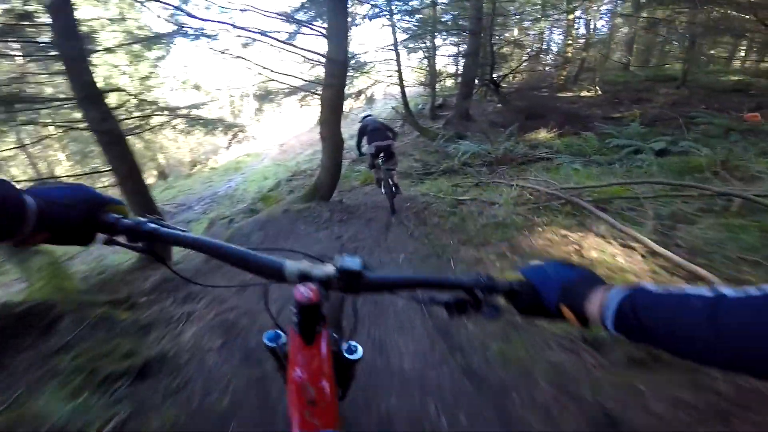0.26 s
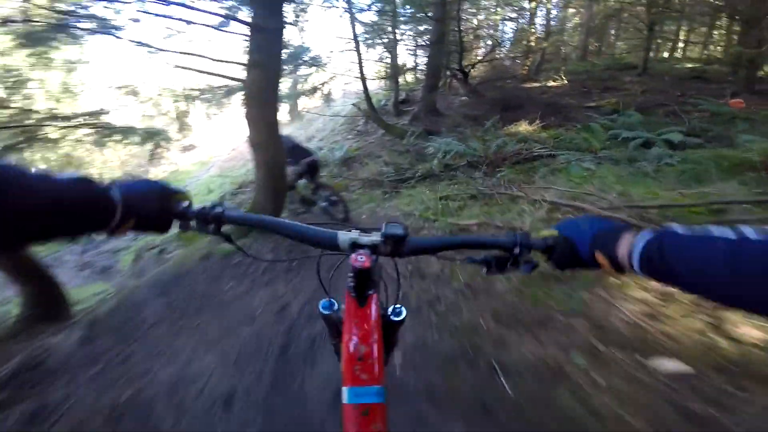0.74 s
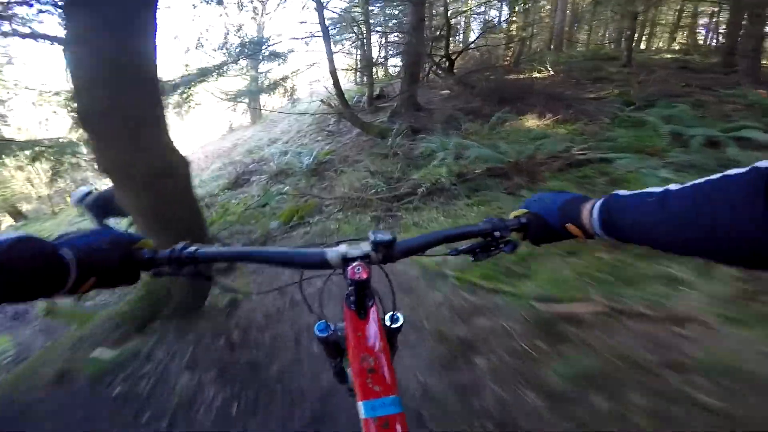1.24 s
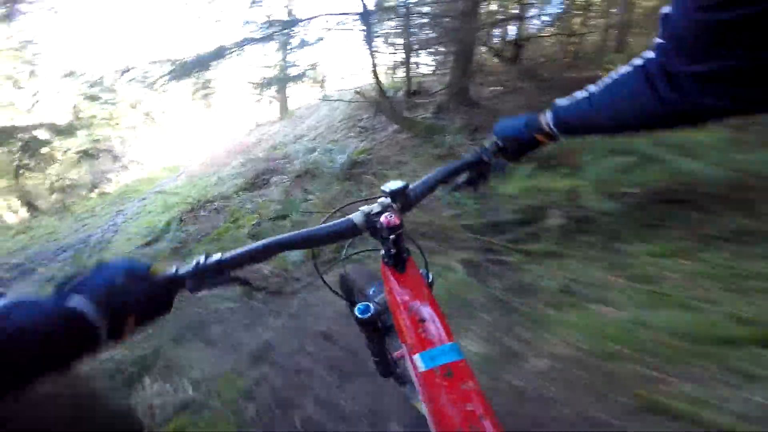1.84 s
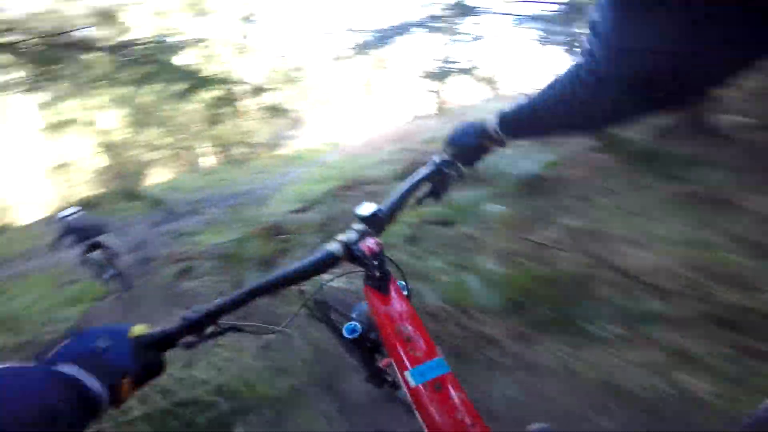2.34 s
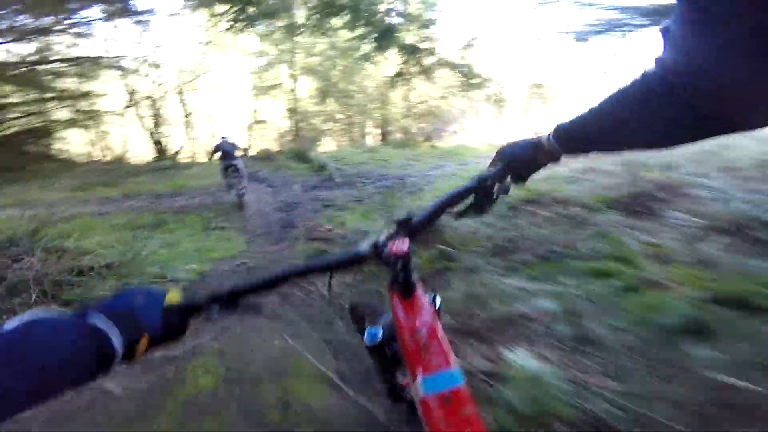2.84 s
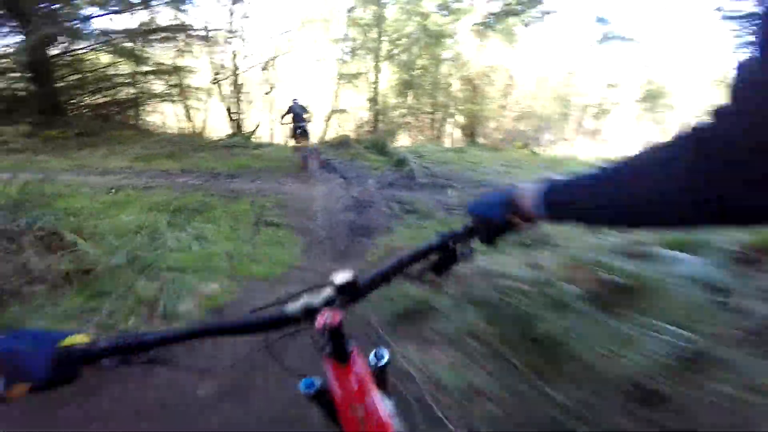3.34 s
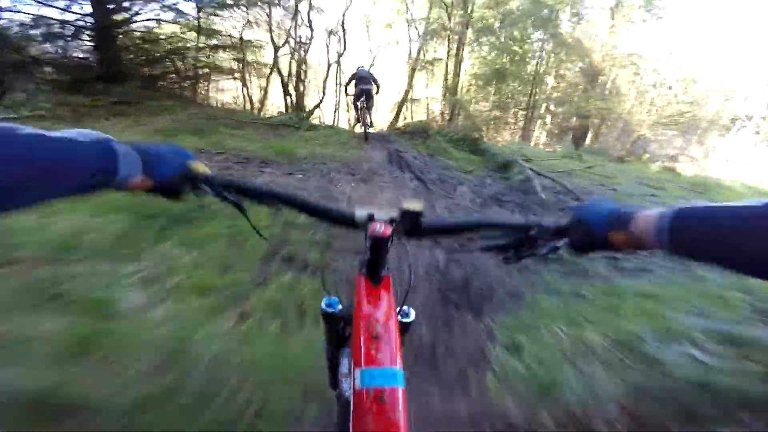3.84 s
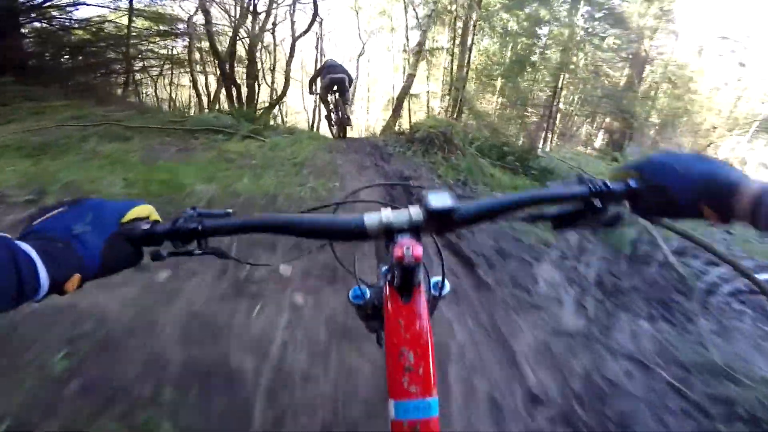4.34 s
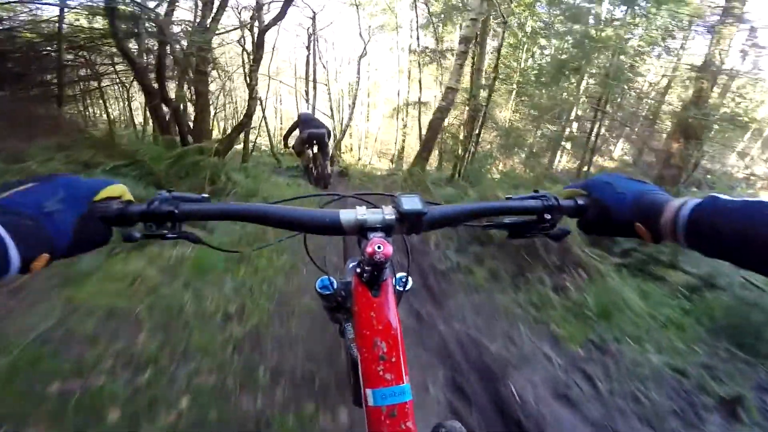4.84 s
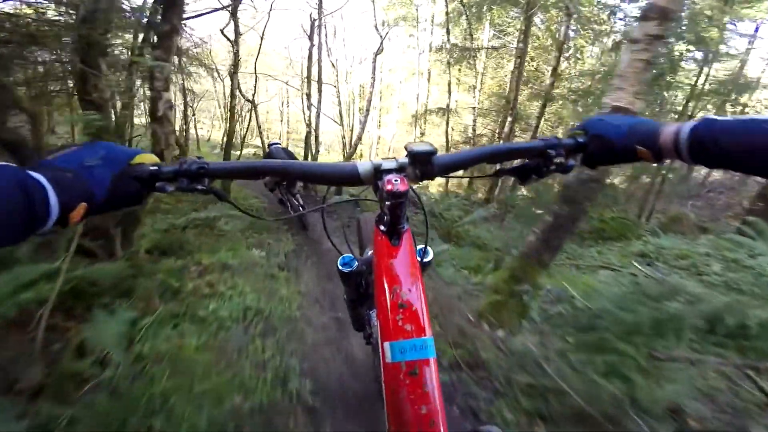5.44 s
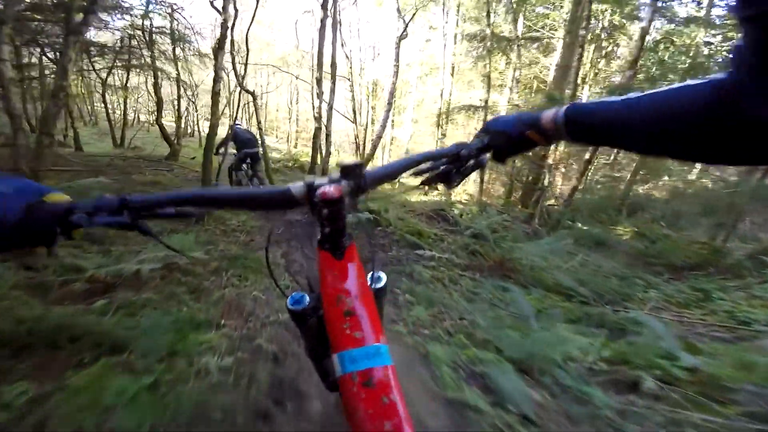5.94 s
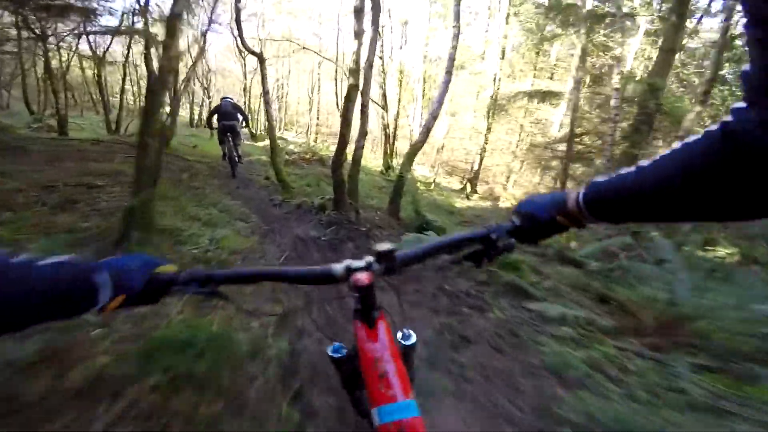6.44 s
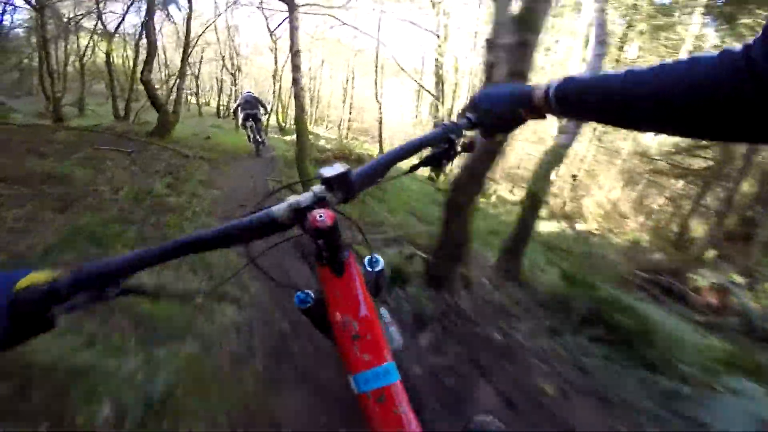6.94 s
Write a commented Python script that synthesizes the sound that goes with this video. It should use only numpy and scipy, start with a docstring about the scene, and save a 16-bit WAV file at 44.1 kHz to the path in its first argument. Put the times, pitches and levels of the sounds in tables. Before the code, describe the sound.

From a microphone worn by the rider, uneven low wind rumble and soft thumps dominate as a mountain bike coasts down a dirt forest trail. Beneath it tyres crunch soil and hiss over grit while the freehub ticks and buzzes. Chain and cables snap sharply on bumps, with a hard hollow knock at two and a half seconds, stones clattering around four, and a loud tyre scrub after six.

```python
"""Wind rumbles and buffets on a chest-worn microphone as a mountain bike coasts fast down a dirt forest trail.
The air is shaped noise with kicks and single swings of pressure; tyres, scrubs and rims are filtered grains.
Struck modes make the stones and knocks, and filtered contacts make chain and cables snap on the frame.
The freehub ticks and buzzes through pawl clicks, and near the end a tyre scrubs through loose dirt."""
import sys
import numpy as np
from scipy import signal
from scipy.fft import rfft, irfft, next_fast_len
from scipy.io import wavfile
from scipy.ndimage import uniform_filter1d, map_coordinates

SR = 44100
rng = np.random.default_rng(int(sys.argv[2]) if len(sys.argv) > 2 else 0)


def wav_out(sig):
    """Save sig, one row per channel (or a flat mono array), as 16-bit PCM at SR to the path in sys.argv[1]."""
    wavfile.write(sys.argv[1], SR, np.round(np.clip(np.atleast_2d(sig).T, -1, 1) * 32767).astype(np.int16))


N = 317079
T = np.arange(N) / SR

# Levels are relative: trims in the functions may shift them. Every spectrum is brought to rms 1.
# Air past the microphone, slack where the rider is sheltered or unweighted.
# Each row: time in seconds, rumble in dB.
WIND_FLOW = [(0, -29), (.28, -17), (.43, -32.5), (.57, -17.5), (1.72, -21), (2.28, -15), (2.42, -37),
             (2.63, -19.5), (2.92, -19.5), (3.1, -32.5), (3.38, -23), (3.53, -27), (4.19, -18),
             (4.31, -37.5), (4.69, -32), (4.86, -18), (5.16, -26.5), (5.39, -28.5), (5.58, -20.5),
             (7.19, -18.5)]
# How broken the flow is. Each row: time in seconds, flutter in dB.
TURBULENCE = [(0, -45.5), (.28, -38), (.43, -52), (.55, -46.5), (.97, -22.5), (1.17, -39.5), (1.55, -39.5),
              (1.93, -30), (2.1, -20.5), (2.43, -46), (2.66, -37.5), (3.07, -51), (3.3, -33.5), (3.53, -50),
              (4.07, -32), (4.33, -44), (5.18, -57), (5.5, -44), (6.25, -42.5), (6.6, -30), (7.19, -32.5)]
# Big eddies. Each row: frequency in Hz, level in dB per Hz.
RUMBLE_SPECTRUM = [(8, -18), (18, -4.5), (28, -2), (52, -3), (72, -8.5), (100, -13), (160, -23), (300, -80)]
# Small eddies. Each row: frequency in Hz, level in dB per Hz.
FLUTTER_SPECTRUM = [(40, -10), (85, -3), (140, -3), (200, -3), (300, -10), (500, -22), (800, -42),
                    (1600, -77)]
# Small eddies popping in strong flow. Each row: frequency in Hz, level in dB per Hz.
RASP_SPECTRUM = [(150, -29), (350, 1.5), (600, -16), (1000, -34), (2500, -50)]
# Deep thumps of air as the body pumps through dips. Each row: centre in seconds, rumble in dB, half length in seconds.
GUSTS = [(.3, -8.5, 0.0099), (1.0, -15, 0.02), (1.125, -14.5, 0.0088), (1.46, -17, 0.051),
         (1.86, -17, 0.062), (2.85, -13, 0.0091), (3.265, -16, 0.047), (3.801, -14.5, 0.023),
         (4.05, -14, 0.028), (4.59, -23.5, 0.027), (4.82, -14, 0.022), (5.46, -17, 0.018),
         (5.73, -24, 0.018), (5.87, -20, 0.0099), (6.1, -14, 0.062), (6.53, -10, 0.017),
         (6.82, -15.5, 0.029), (7.17, -13.5, 0.011)]
# The flow lets go of the microphone for a moment. Each entry: centre in seconds.
LULL_TIMES = [1.17, 1.95, 2.19, 2.45, 2.78, 3.15, 3.94, 4.27, 4.67, 5.654, 5.985, 6.77]
LULL_DB, LULL_HALF_S = -10.5, .026
# Eddies that hit the microphone as the rider is jolted.
# Each row: centre in seconds, level in dB, length in seconds, upper edge in Hz.
BUFFETS = [(0.163, -17, 0.0029, 199), (0.298, -18.5, 0.006, 200), (0.549, -19, 0.031, 166),
           (0.792, -14.5, 0.014, 222), (0.893, -16.5, 0.0096, 220), (0.937, -16, 0.013, 253),
           (1.006, -10, 0.007, 330), (1.061, -12.5, 0.013, 211), (1.113, -15, 0.0053, 227),
           (1.241, -17, 0.0057, 254), (1.303, -15.5, 0.004, 161), (1.455, -12.5, 0.01, 229),
           (1.558, -11, 0.0063, 200), (1.594, -13.5, 0.0038, 190), (1.62, -16, 0.0067, 250),
           (1.805, -10.5, 0.013, 250), (2.024, -14, 0.0069, 230), (2.068, -14, 0.027, 270),
           (2.249, -11.5, 0.028, 320), (2.319, -14.5, 0.0041, 219), (2.69, -19, 0.0061, 179),
           (2.834, -16, 0.0074, 95), (2.914, -14, 0.0046, 240), (4.834, -13, 0.011, 142),
           (4.875, -21, 0.0044, 149), (5.313, -15, 0.005, 155), (5.525, -15.5, 0.005, 116),
           (5.571, -16, 0.0063, 146), (5.611, -16, 0.0038, 129), (5.744, -16, 0.012, 122),
           (5.919, -19.5, 0.014, 105), (6.071, -13, 0.011, 158), (6.1, -14, 0.017, 396),
           (6.145, -18, 0.0044, 200), (6.517, -9.5, 0.0088, 322), (6.636, -13.5, 0.0032, 293),
           (6.696, -10.5, 0.011, 338), (6.815, -10.5, 0.0089, 420), (6.865, -14.5, 0.02, 240),
           (7.067, -18.5, 0.0023, 443), (7.149, -16, 0.0027, 454)]
# the flutter that trails each buffet
WAKE_DB, WAKE_HALF_S, WAKE_LAG_S = -19.5, 0.024, 0.005
# flow calmer than BROKEN_DB loses the top of its rumble
SMOOTH_HZ, SMOOTH_DB_PER_DB, BROKEN_DB = 74, 0.16, -30
# Tight single vortices in the hardest jolts. Each row: centre in seconds, peak in dB, pitch in Hz.
POPS = [(0.2944, -9, 191), (0.7931, -14, 210), (0.9642, -14, 230), (1.42, -9, 167), (1.8141, -7.5, 230),
        (2.0516, -12.5, 190), (2.0689, -14, 180), (2.2317, -11, 350), (2.2438, -1.5, 250),
        (2.2467, -0.5, 473), (2.2561, -10, 310), (2.2608, -7, 330), (2.2977, -10, 220), (6.8042, -10, 270),
        (6.811, -5.5, 290), (6.8203, -3, 310), (6.8293, -13, 280), (6.9832, -12, 250)]
# Soft airy swishes over the tyre noise. Each row: centre in seconds, level in dB, half length in seconds.
SWISHES = [(.88, -49.5, 0.16), (3.05, -50, 0.2), (5.34, -48.5, 0.098)]
# Hiss of a swish. Each row: frequency in Hz, level in dB per Hz.
SWISH_SPECTRUM = [(2500, -27), (4000, 5), (5000, 2), (5750, 10), (6500, -13), (10000, -35)]

# Tyres on the ground. Each row: time in seconds, crunch of soil in dB, hiss of needles and grit in dB.
TYRE_LEVELS = [(0, -40, -44.5), (.3, -38.5, -44), (.47, -43.5, -47), (.75, -37, -48), (.95, -37, -44.5),
               (1.12, -39.5, -46.5), (1.62, -37.5, -47.5), (1.9, -39, -50), (2.5, -37.5, -44.5),
               (2.85, -39.5, -45.5), (3.15, -35, -42.5), (3.7, -37.5, -46), (4.22, -36, -41),
               (4.7, -41, -44.5), (5.15, -41, -47), (5.45, -38.5, -45), (6.3, -39.5, -45.5),
               (6.6, -36, -41.5), (7.19, -39, -42)]
# Crushed soil. Each row: frequency in Hz, level in dB per Hz.
SOIL_SPECTRUM = [(270, 7), (600, 3.5), (850, -0.5), (1100, 3), (1700, 0.5), (2000, -2), (2500, -0.5),
                 (3100, -8.5), (4200, -9.5), (9000, -31)]
# Flicked grit. Each row: frequency in Hz, level in dB per Hz.
GRIT_SPECTRUM = [(1500, -45), (3000, 0.5), (4600, 0.5), (5700, -1), (6600, -3.5), (9000, -4.5),
                 (12000, -9.5), (15000, -9)]
# the crunch has a centre that wanders with the soil, by a fraction of its pitch
CRUNCH_HZ, CRUNCH_WIDTH_HZ, CRUNCH_WANDER = 1567, 335, 0.087
# the finest grit starts faint and comes in as the bike picks up speed
FINE_HZ, FINE_START_DB, PICK_UP_S = 6000, -15, 0.52
# Tread knobs drumming on packed dirt. Each row: time in seconds, level in dB.
TREAD_LEVEL = [(0, -45), (.15, -40), (.45, -45.5), (.65, -43), (2.9, -55), (3.25, -40), (3.6, -46.5),
               (4.15, -56), (4.6, -70), (7.19, -37.5)]
# The drumming glides down in pitch. Each row: time in seconds, pitch in Hz.
TREAD_PITCH = [(.8, 620), (3.2, 532)]
TREAD_WIDTH_HZ = 200
# Tread drumming harder over roots and stones. Each row: centre in seconds, level in dB.
ROOTS = [(.13, -32.5), (3.2, -27), (3.36, -26), (3.379, -23.5)]
ROOT_HALF_S = 0.0057
# Loose stones knocked aside by the tyres. Each row: start in seconds, level in dB, pitch in Hz.
STONES = [(4.013, -24, 1300), (4.034, -19, 1250), (4.079, -18, 620), (4.128, -18, 680), (4.2, -22, 1250),
          (4.488, -21, 1150)]
# A tyre scrubbing sideways or breaking clods. Each row: centre in seconds, level in dB, half length in seconds.
SCRUBS = [(3.21, -35.5, 0.015), (3.369, -32, 0.013), (4.14, -43, 0.072), (6.3745, -14.5, 0.0033),
          (6.385, -28.5, 0.027), (6.525, -27.5, 0.066)]
# Torn ground. Each row: frequency in Hz, level in dB per Hz.
SCRUB_SPECTRUM = [(200, 7), (500, 6.5), (1000, 2), (1900, 1), (2700, -7), (5000, -16), (8000, -26),
                  (15000, -55)]
# Side knobs biting into a turn. Each row: start in seconds, level in dB, fade in seconds.
SCRAPES = [(.505, -35, 0.14), (6.445, -28, 0.044)]
# Raked grit. Each row: frequency in Hz, level in dB per Hz.
SCRAPE_SPECTRUM = [(1000, -11), (1500, 0.5), (3600, -5.5), (4800, -28)]

# The rims sing with the grit under them. Each row: time in seconds, level in dB.
RIM_LEVEL = [(0, -48.5), (1.9, -57), (3.6, -43.5), (5.2, -51), (7.19, -44.5)]
RIM_HZ, RIM_WIDTH_HZ = 2557, 490
# The freehub slips faster or slower as wheel and cranks turn. Each row: time in seconds, pawl clicks a second.
PAWL_RATE = [(0, 31), (.17, 33), (.38, 42), (.45, 55), (.75, 67), (.91, 47), (1, 58), (1.06, 44),
             (1.15, 56), (1.4, 56), (1.75, 122), (2.08, 73), (2.32, 120), (2.7, 66), (3.25, 72), (3.55, 45),
             (4.25, 39), (4.83, 75), (5.1, 62), (5.45, 98), (5.6, 73), (6.1, 70), (6.5, 107), (7.19, 105)]
# How hard the pawls strike. Each row: time in seconds, ticks in dB, steel ping in dB relative to the ticks.
PAWL_LEVEL = [(0, -50, -21), (.33, -51, -25), (.5, -46, -30), (.8, -51, -18), (.9, -47.5, -1.5),
              (1.36, -49, -8), (1.56, -55, -9), (1.94, -49, 0), (2.35, -48, -7), (2.85, -50, -3),
              (3.6, -49.5, -21), (4.1, -51, -14), (4.85, -48, -4.5), (5.5, -47, -5.5), (6.2, -47.5, -12),
              (7.19, -48, -6)]
# The steel ring's ping shifts with load. Each row: time in seconds, mean pitch in Hz.
PING_PITCH = [(.9, 9350), (1.85, 9600), (2.2, 8580), (2.6, 9080), (4.8, 8880), (5.15, 8540), (5.45, 9300),
              (5.8, 8550), (7.19, 8630)]
# The hub shell. Each row: frequency in Hz, level in dB per Hz.
HUB_SPECTRUM = [(1550, -57), (2050, 20), (2650, 17), (3300, 19), (4500, 2.5), (7000, 8.5), (8200, 6.5),
                (11000, 6), (13200, 2), (14200, 9), (15200, -2), (17000, -25)]
# Hollow knocks of the bike over roots. Each row: start in seconds, level in dB.
KNOCKS = [(2.5069, -2), (2.573, -22.5)]
# Modes of a knock. Each row: frequency in Hz, level in dB, t60 in seconds.
KNOCK_MODES = [(1140, 0.5, 0.0044), (1650, -3.5, 0.0072), (1800, -2, 0.012)]
# Chain and cables snapping on the frame.
# Each row: start in seconds, level in dB, brightness in dB per octave, rattle t60 in seconds.
SNAPS = [(0.51, -13, 11, 0.023), (1.006, -11, 4.5, 0.018), (1.394, -16.5, -1, 0.02),
         (1.7031, -12, 0.5, 0.024), (1.97, -15.5, 3, 0.015), (2.0202, -15.5, 0.5, 0.027),
         (2.507, -7.5, 6.5, 0.026), (2.616, -11.5, -8.5, 0.026), (3.355, -14, -1.5, 0.027),
         (3.73, -7.5, -0.5, 0.05), (3.9093, -3.5, 1, 0.0065), (3.994, -22, 4, 0.022),
         (4.399, -8, 0.5, 0.029), (4.503, -21, -7, 0.014), (6.0809, -3, 3.5, 0.021),
         (6.2886, -10.5, 1, 0.015), (6.3597, -17.5, 3, 0.02), (7.038, -12.5, 0, 0.015),
         (7.16, -10, 2.5, 0.026)]
# What the frame makes of a snap. Each row: frequency in Hz, level in dB per Hz.
FRAME_SPECTRUM = [(400, -21), (1000, -4), (1450, 9), (2200, 9.5), (2800, 5.5), (3300, 15), (4200, 6.5),
                  (5100, 13), (6600, 5), (9000, 4), (11000, 0.5), (14500, -15), (16500, 5)]
EDGE_HZ = 15400  # top of the band


def gain_of(db):
    """Decibels to amplitude."""
    return 10 ** (np.asarray(db) / 20)


def evened(x):
    """Scales to rms 1."""
    return x / np.sqrt(np.mean(x ** 2) + 1e-20)


def read(points, hz):
    """A spectrum table in dB, joined on a log-frequency axis."""
    f, db = np.transpose(points)
    return np.interp(np.log(hz + 1), np.log(f + 1), db)


def curves(rows):
    """Each column of a time table, at every sample."""
    s, *columns = np.transpose(rows)
    return [np.interp(T, s, c) for c in columns]


def add(mix, s, sound):
    """Mixes a sound in at time s."""
    part = mix[max(round(s * SR), 0):][:len(sound)]
    part += sound[:len(part)]


def coloured(x, spectrum):
    """Gives x a spectrum, at rms 1."""
    size = next_fast_len(N)
    gain = gain_of(read(spectrum, np.fft.rfftfreq(size, 1 / SR)))
    return evened(irfft(rfft(x, size) * gain, size)[:N])


def drift(per_s):
    """Smooth chance of rms 1, through per_s random points a second."""
    return evened(map_coordinates(rng.standard_normal(4096), [T * per_s], order=2, mode="wrap"))


def steadied(x, size):
    """Evens out the swells of a noise over size samples."""
    power = abs(signal.hilbert(x, next_fast_len(N))[:N]) ** 2
    smooth_power = uniform_filter1d(uniform_filter1d(power, size), size)
    return evened(x / np.sqrt(smooth_power + 1e-6))


def grains(per_s, spread_db):
    """Random tiny impacts, a few of them large."""
    size = gain_of(spread_db * np.minimum(rng.exponential(1, N), 4))
    return evened(size * rng.choice([-1, 1], N) * (rng.random(N) < per_s / SR))


def swells(rows):
    """Rounded bumps of level, down to half at the half length."""
    return sum(gain_of(db) / (1 + np.square(np.square((T - s) / half))) for s, db, half in rows)


def resonate(x, hz, width):
    """A steep resonance whose centre may move, at rms 1."""
    turn = np.exp(2j * np.pi * np.cumsum(hz * np.ones(N)) / SR)
    r = np.exp(-np.pi * width / SR)
    # shift the centre down to 0 Hz, smooth, and shift back
    smooth = signal.lfilter([1], [1, -2 * r, r * r], x / turn + 1e-18)
    return evened((turn * smooth).real)


def ring(modes, t):
    """Dying modes of a struck part."""
    return sum(gain_of(db - 60 * t / t60) * np.sin(2 * np.pi * hz * t) for hz, db, t60 in modes)


def wind(rumble_db=3.0, flutter_db=1.0, lumpy_db=4, rasp_db=-8.5, rasp_growth=0.72,
         gust_flutter_db=-25, surge_db=2.0, flutter_surge_db=3.0):
    """Big eddies rumble in bumps and lulls; small ones flutter, trail buffets and pop apart in stronger flow."""
    [flow_db], [broken_db] = curves(WIND_FLOW), curves(TURBULENCE)
    surge, gusts = drift(20), swells(GUSTS)
    lull_db = LULL_DB * swells([(s, 0, LULL_HALF_S) for s in LULL_TIMES])
    wakes = swells([(s + WAKE_LAG_S, db + WAKE_DB, WAKE_HALF_S) for s, db, _, _ in BUFFETS])
    slow = np.hypot(gain_of(flow_db + lull_db + surge_db * surge), gusts)
    fast = np.hypot(gain_of(broken_db + lull_db + flutter_surge_db * surge),
                    wakes + gain_of(gust_flutter_db) * gusts)

    rumble = steadied(coloured(rng.standard_normal(N), RUMBLE_SPECTRUM), size=1600)
    deep = signal.sosfiltfilt(signal.butter(3, SMOOTH_HZ, fs=SR, output="sos"), rumble)
    top_db = SMOOTH_DB_PER_DB * (broken_db - BROKEN_DB) + flutter_surge_db * (surge - 1)
    rumble = deep + (rumble - deep) * gain_of(np.minimum(top_db, 0))

    lumps = gain_of(lumpy_db * drift(70))
    flutter = steadied(coloured(rng.standard_normal(N), FLUTTER_SPECTRUM) * lumps, size=2400)
    rasp = coloured(grains(130, 0.71), RASP_SPECTRUM) * gain_of(rasp_db + rasp_growth * (broken_db + 28.5))
    return gain_of(rumble_db) * slow * rumble + gain_of(flutter_db) * fast * (flutter + rasp)


def buffets(level_db=-3, low_hz=110, steepness=3.0, kick=0.58):
    """Each eddy is one hard kick of pressure in a short flurry of lesser ones; sharper ones reach higher."""
    out, t = np.zeros(N), (np.arange(8192) - 4096) / SR
    hz = np.fft.rfftfreq(len(t), 1 / SR)
    for s, db, length, edge_hz in BUFFETS:
        low_cut = (1j * hz / (1j * hz + low_hz)) ** 2
        colour = low_cut / np.sqrt(1 + (hz / edge_hz) ** (2 * steepness))
        swell = 1 / (1 + (t / length) ** 4)
        kicks = rng.standard_normal(len(t)) * (rng.random(len(t)) < 500 / SR) * swell
        kicks /= np.linalg.norm(kicks) + 1e-9
        kicks[len(t) // 2] += kick * rng.choice([-1, 1])
        puff = irfft(rfft(kicks) * colour)
        # energy in proportion to length
        puff *= np.sqrt(1.88 * length * SR / np.sum(puff ** 2))
        add(out, s + t[0], gain_of(db + level_db) * puff)
    return out


def pops():
    """A passing vortex pushes the diaphragm, then pulls it: one smooth swing of pressure, quicker when tight."""
    out, t = np.zeros(N), np.arange(-1024, 1024) / SR
    for s, db, hz in POPS:
        u = 2 * np.pi * hz * t
        swing = -u / np.square(1 + u * u)
        add(out, s + t[0], gain_of(db) * swing / swing.max())
    return out


def swishes():
    """Smooth, bright hiss that comes and goes."""
    return swells(SWISHES) * coloured(rng.standard_normal(N), SWISH_SPECTRUM)


def drumming(per_s, spread_db):
    """Knob strikes ringing the tyre casing."""
    [hz] = curves(TREAD_PITCH)
    return resonate(grains(per_s, spread_db), hz, TREAD_WIDTH_HZ)


def tyres(soil_db=-2.5, centre_db=-8.0, grit_db=-1.5, soil_patchy_db=1.7, grit_patchy_db=1.6):
    """Knobs crush soil and flick grit in dense grains, and drum where the ground is packed."""
    crunch_db, hiss_db = curves(TYRE_LEVELS)
    [tread_db] = curves(TREAD_LEVEL)
    ground = drift(45)  # patches shared by soil and grit
    # two layers, each with its own patches
    soil = sum(coloured(grains(1300, 3.03), SOIL_SPECTRUM) * gain_of(soil_patchy_db * drift(25)) for _ in range(2))
    centre_hz = CRUNCH_HZ * (1 + CRUNCH_WANDER * drift(5))
    centre = resonate(grains(1200, 1.9), centre_hz, CRUNCH_WIDTH_HZ)
    soil = evened(soil) + gain_of(centre_db) * centre
    soil *= gain_of(crunch_db + soil_db + soil_patchy_db * ground)

    grit = evened(coloured(grains(9000, 4.6), GRIT_SPECTRUM) * gain_of(grit_patchy_db * ground))
    grit *= gain_of(hiss_db + grit_db)
    fine = signal.sosfiltfilt(signal.butter(4, FINE_HZ, "high", fs=SR, output="sos"), grit)
    grit = grit - fine + fine * gain_of(FINE_START_DB * np.exp(-T / PICK_UP_S))
    return soil + grit + gain_of(tread_db) * drumming(260, 4.5)


def roots():
    """A root squeezes the tread and it drums briefly."""
    return swells([(s, db, ROOT_HALF_S) for s, db in ROOTS]) * drumming(2000, 0.96)


def stones():
    """A stone knocks the tyre and drags along a trickle of softer ones, each at its own pitch."""
    out, t = np.zeros(N), np.arange(2048) / SR
    for s, db, hz in STONES:
        modes = [(hz, db, .007), (hz * 2.1, db - 6, .005)]
        add(out, s, ring(modes, t))
        # nine followers; a higher pitch also dies sooner
        for delay, shift in rng.uniform((0, .7), (.035, 1.4), (9, 2)):
            add(out, s + delay, .5 * np.exp(-delay / .03) * ring(modes, t * shift))
    return out


def scrubs():
    """A sliding tyre tears a burst of coarse grains from the ground."""
    return swells(SCRUBS) * coloured(grains(2200, 3.9), SCRUB_SPECTRUM)


def scrape():
    """Side knobs catch abruptly and rake coarse grit, fading as the tyre finds grip."""
    level = np.zeros(N)
    for s, db, fade in SCRAPES:
        catch = np.clip((T - s) / .025, 0, 1)
        level += catch * np.exp(-abs(T - s) / fade) * gain_of(db)
    return level * coloured(grains(600, 2.5), SCRAPE_SPECTRUM)


def rims():
    """Grit keeps one narrow resonance of the wheels ringing unevenly."""
    [level_db] = curves(RIM_LEVEL)
    return gain_of(level_db) * resonate(grains(900, 4.8), RIM_HZ, RIM_WIDTH_HZ)


def knocks(level_db=4, rise=0.00045):
    """Short hollow clacks, their edge softened by rubber."""
    out, t = np.zeros(N), np.arange(2048) / SR
    soft_edge = 1 - np.exp(-(t / rise) ** 2)
    for s, db in KNOCKS:
        add(out, s, gain_of(db + level_db) * ring(KNOCK_MODES, t) * soft_edge)
    return out


def snaps(level_db=12, rattle_db=-17.0, air_db=-41, air_t60=0.021, rebound=0.32):
    """A hard contact, a quick rebound and a few milliseconds of chatter, coloured by the frame."""
    out, t = np.zeros(N), np.arange(4096) / SR
    hz = abs(np.fft.fftfreq(len(t), 1 / SR))
    for s, db, bright, t60 in SNAPS:
        colour_db = read(FRAME_SPECTRUM, hz) + bright * np.log2((hz + 500) / 5500)
        # minimum phase: the frame answers only after the contact
        causal = np.exp(np.conj(signal.hilbert(np.log(gain_of(colour_db)))))
        fading = gain_of(rattle_db - 60 * t / t60) + gain_of(air_db - 60 * t / air_t60)
        blow = rng.standard_normal(len(t)) * fading
        blow[0] += 1
        blow[rng.integers(40, 160)] += rebound  # 1 to 4 ms later
        snap = np.fft.ifft(np.fft.fft(blow) * causal).real
        add(out, s + 0.00039, gain_of(db + level_db) * snap / np.linalg.norm(snap))
    return out


def freehub(level_db=0.5, ping_db=-1.5, uneven_db=3.0, tail=0.44, tick_s=0.0014, tail_s=.005):
    """Pawls drop off ratchet teeth: each has its own chatter, which sounds the hub shell and pings the steel ring."""
    [rate], [ping_hz] = curves(PAWL_RATE), curves(PING_PITCH)
    hub_db, steel_db = curves(PAWL_LEVEL)
    teeth = np.diff(np.round(np.cumsum(rate) / SR), prepend=0)
    # quicker clicks are softer
    drops = teeth * gain_of(uneven_db * rng.standard_normal(N)) / np.sqrt(rate)
    t = np.arange(1300) / SR
    tick = t / tick_s * np.exp(-t / tick_s) + tail * np.exp(-t / tail_s)
    pawl = np.cumsum(teeth) % 6  # six pawls take turns
    chatter = np.zeros(N)
    for k in np.unique(pawl):
        pawl_sound = tick * rng.standard_normal(len(t))
        chatter += signal.oaconvolve(drops * (pawl == k), pawl_sound)[:N]
    # the ping also wavers, slowly and from tooth to tooth
    pitch = ping_hz * (1 + .018 * drift(40) + .045 * drift(1100))
    envelope = signal.oaconvolve(drops, tick)[:N]
    ping = evened(envelope * np.sin(2 * np.pi * np.cumsum(pitch) / SR))
    return gain_of(hub_db + level_db) * (coloured(chatter, HUB_SPECTRUM) + gain_of(steel_db + ping_db) * ping)


def scene():
    """Air, ground and bike at one microphone."""
    air = wind() + buffets() + pops() + swishes()
    ground = tyres() + roots() + stones() + scrubs() + scrape()
    bike = rims() + knocks() + snaps() + freehub()
    return (air + ground + bike)[None]


def record(dry):
    """The loudest peaks are rounded off; then the band limit."""
    rounded = dry / (1 + abs(dry) ** 6) ** (1 / 6)
    low_pass = signal.firwin(501, EDGE_HZ, window=("kaiser", 8), fs=SR)
    return signal.oaconvolve(rounded, low_pass[None], "same")


dry = scene()
out = record(dry)
wav_out(out)
```